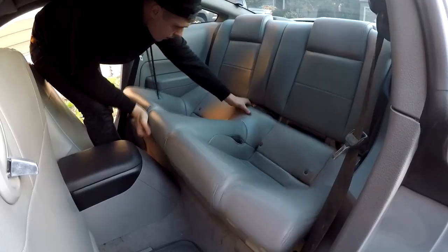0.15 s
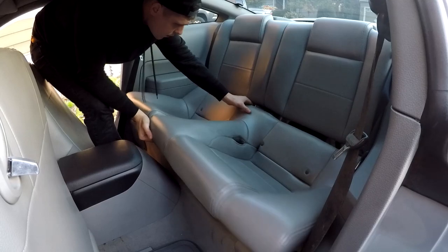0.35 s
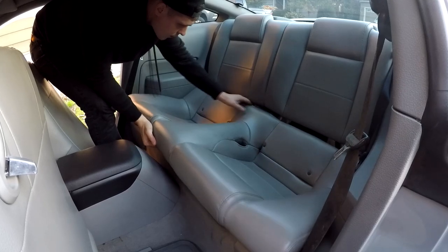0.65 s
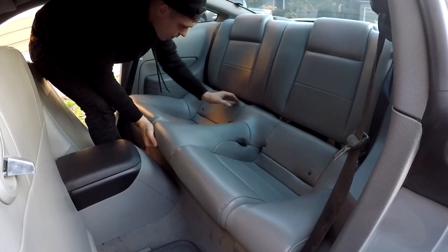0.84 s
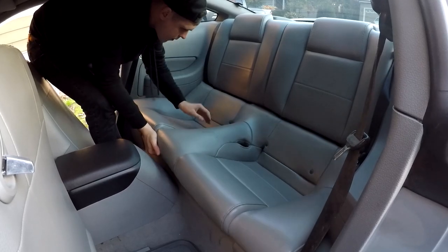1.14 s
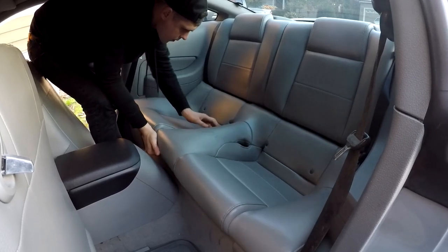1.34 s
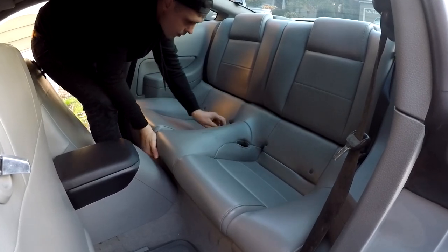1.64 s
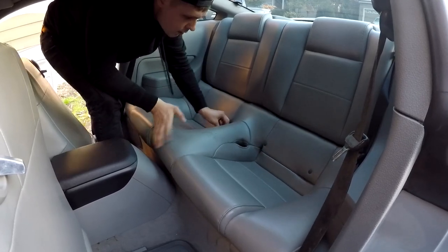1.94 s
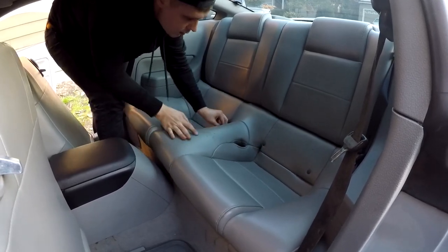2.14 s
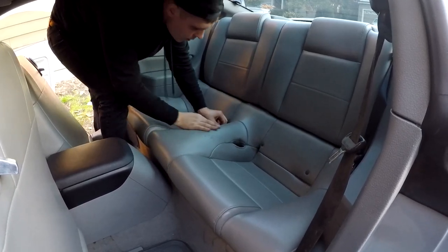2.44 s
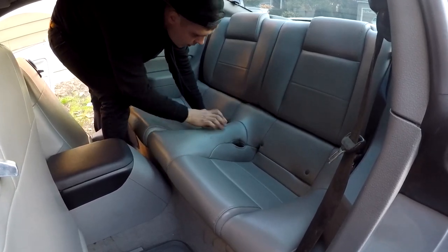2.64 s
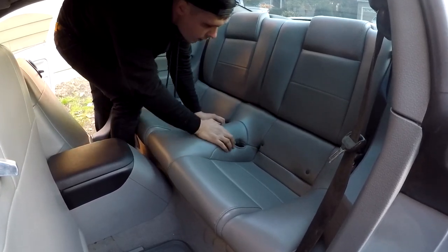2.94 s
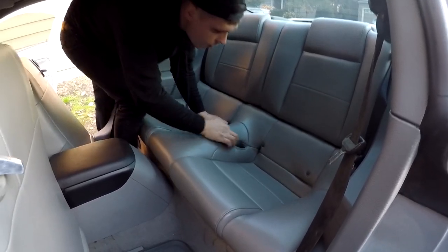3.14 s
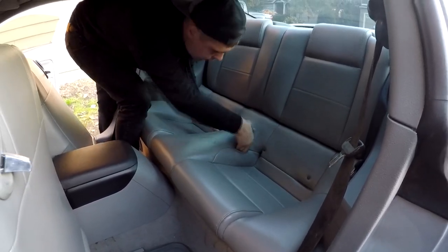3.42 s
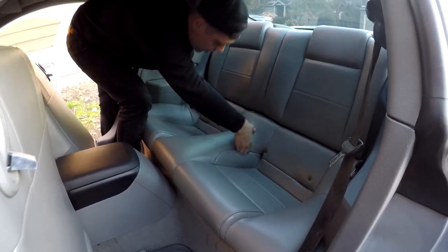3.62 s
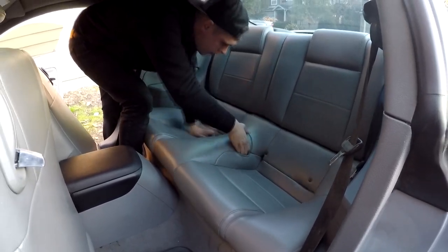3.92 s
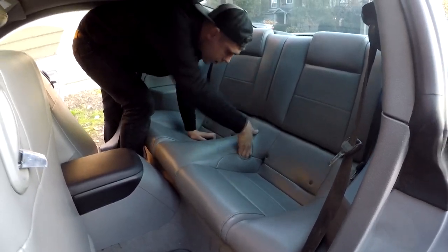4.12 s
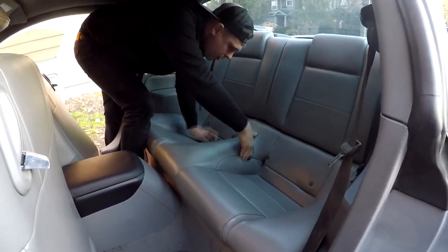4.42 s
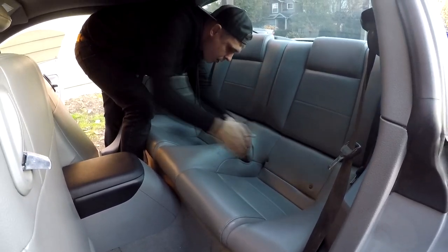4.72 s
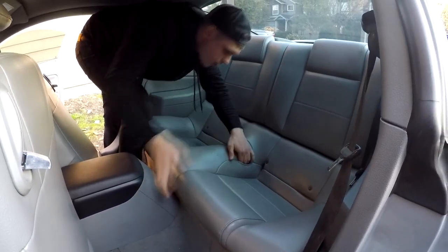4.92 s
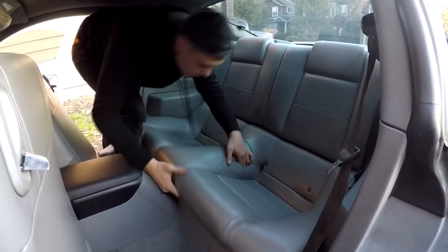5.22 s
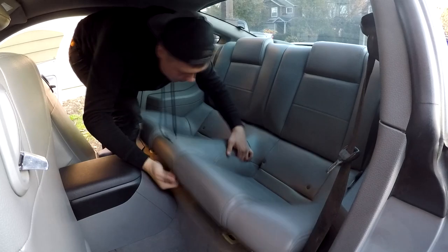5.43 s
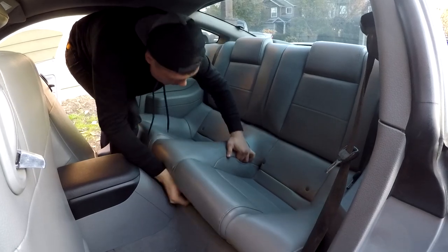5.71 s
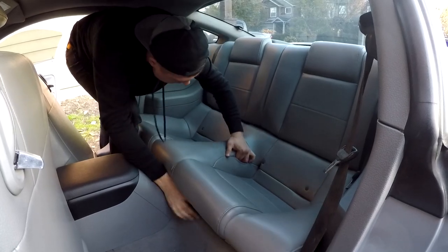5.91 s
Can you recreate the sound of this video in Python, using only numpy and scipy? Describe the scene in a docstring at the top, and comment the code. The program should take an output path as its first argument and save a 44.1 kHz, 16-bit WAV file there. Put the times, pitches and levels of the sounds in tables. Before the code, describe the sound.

Close inside a small, dry car cabin, a leather seat cushion is worked into place by hand. Soft rocking and rubbing lead to knocks and heavy low thuds around one second, then faint bird chirps through the open door. After a quieter stretch of sleeve rustle and seam scrapes, harder shoves and clacks crowd the middle, leather squeaks, and a last knock and bright snap finish.

```python
"""A leather rear seat cushion is pushed into place by hand in a parked car with the door open, 6 s.
From the start filtered noise rocks, flexes and rubs; frame knocks (noise bursts, ringing modes) soon join.
The stereo image narrows from 0.1 to 0.9 s; damped-sine thuds and case jolts follow, then three bird chirps
(wandering tones) from 1.3 to 2 s. From 2.4 s fingers scrape seams (resonated slips); shoves crowd 3 to 4.5 s,
leather squeaks (gliding tones and resonances) follow, mostly up to 5.3 s; a knock and a snap end it."""
import sys
import numpy as np
from scipy import signal
from scipy.fft import rfft, irfft, next_fast_len
from scipy.io import wavfile

SR = 44100
rng = np.random.default_rng(int(sys.argv[2]) if len(sys.argv) > 2 else 0)


def dump_mix(stems):
    """Bounce the given channels to the path in sys.argv[1] as a 16-bit WAV at rate SR."""
    frames = np.atleast_2d(stems).T  # one column per channel
    limited = np.clip(frames, -1, 1)  # hard clip at full scale
    pcm = np.round(limited * 32767).astype(np.int16)
    wavfile.write(sys.argv[1], SR, pcm)


N = 267422

# Levels are relative within a layer; a positive left-right dB means louder on the left.
# Outdoor bird chirps. Each row: start in seconds, level in dB.
CHIRP_STARTS = [(1.275, -47), (1.455, -47.5), (1.965, -50)]
# Course of one chirp. Each row: time from its start in seconds, pitch in Hz, level in dB.
CHIRP_COURSE = [(0, 4580, -4), (0.021, 5160, -0.5), (.05, 4780, 1), (0.1, 4270, -16.5)]
# Jolts through the bodywork into the microphone case. Each row: start in seconds, level in dB, left-right dB.
CASE_JOLTS = [(0.825,-26.5,-12), (1.449,-21.5,-7), (2.949,-13.5,-9), (3.223,-23.5,-11), (3.413,-19.5,-8),
              (3.672,-21.5,-6), (4.225,-23,-4), (4.264,-19.5,-5), (5.225,-20.5,-7.5)]
# Spectrum of that path. Each row: frequency in Hz, level in dB per Hz.
BODYWORK_SPECTRUM = [(70, -4.5), (190, 8), (450, -11.5), (1500, -37.5), (5000, -56)]
# Bright snaps of seams and clips. Each row: start in seconds, rasp level in dB, top treble level in dB.
SEAM_SNAPS = [(1.637,-16,-34.5), (2.721,-26.5,-44), (3.307,-18.5,-26), (3.356,-21,-44), (3.630,-21,-55),
              (5.574,-24,-47), (6.05,-15.5,-29.5)]
# Leather squeaks. Each row: start in seconds, length in seconds, mid pitch in Hz, level in dB,
# glide over the squeak in Hz, width in Hz.
LEATHER_SQUEAKS = [(1.11, 0.096, 4350, -54.5, 7, 190), (3.65, 0.36, 3460, -55, 160, 250),
                   (4.295, 0.05, 5520, -42, -200, 800), (4.308, 0.07, 6886, -47.5, 0, 90),
                   (4.324, 0.055, 3806, -39, 0, 99), (4.34, 0.24, 3806, -57, 7, 45),
                   (4.606, 0.091, 3810, -54, -260, 110), (4.895, 0.1, 4400, -57.5, -30.5, 70),
                   (5.295, 0.05, 1880, -49, 33, 190)]
# Fingers scraping seams. Each row: start in seconds, length in seconds, rasp level in dB, rasp pitch in Hz,
# groan level in dB, left-right dB of the groan.
SEAM_SCRAPES = [(2.416, 0.08, -42.5, 600, -37.5, -6.5), (2.87, 0.18, -48, 1470, -42.5, -11),
                (3.065, 0.2, -45, 1430, -40, 14), (3.841, 0.14, -41.5, 2350, -37.5, -1),
                (4.156, 0.14, -38, 1530, -31, -12), (4.552, 0.12, -49.5, 2780, -48, 34),
                (4.759, 0.078, -46.5, 1830, -62, -5)]
# Shoves of foam on the floor pan. Each row: start in seconds, level in dB, pitch in Hz.
FLOOR_THUDS = [(0.744,-11,60), (1.045,-12.5,53.4), (1.091,-9.5,33.2), (1.214,-13,68.7), (1.877,-19,44.3),
               (3.065,-12,57.6), (3.638,-6,57), (3.715,-9,45.6), (3.902,-10.5,39.7), (3.957,-6.5,163.5),
               (4.209,-8.5,40), (5.387,-16.5,79), (5.509,-20,56), (5.671,-16,150)]
# Frame and trim knocks. Each row: start in seconds, clack level in dB, body level in dB,
# ring of the struck spot in Hz, left-right dB.
FRAME_KNOCKS = [(0.160,-30.5,-33,402,4), (0.254,-33,-36,448,8), (0.639,-35,-28.5,380,0),
                (0.71,-36,-31.5,420,0), (0.904,-21.5,-23,664,0), (1.021,-31.5,-54,1320,-2),
                (1.048,-29,-24.5,430,-1.5), (1.127,-32.5,-23.5,510,-1), (1.238,-35.5,-28.5,750,-3),
                (1.49,-37.5,-24.5,670,-4), (1.599,-18,-26,734,-6.5), (1.624,-22.5,-21,630,0),
                (1.635,-22.5,-23,1000,-4), (2.471,-25.5,-26.5,1560,1), (2.526,-31.5,-33.5,1450,-2),
                (3.074,-35,-32,520,17), (3.103,-32,-26.5,940,26), (3.345,-20,-51,1750,-8),
                (3.366,-17,-29.5,910,-1), (3.468,-13.5,-29.5,1840,-7.5), (3.493,-24,-27.5,1380,-10),
                (3.541,-30,-27,1800,-7), (3.577,-29.5,-31,685,-5), (4.091,-27,-21,443,-2.5),
                (4.111,-22.5,-20,1260,2), (4.458,-25.5,-21.5,940,-5.5), (4.481,-30,-22.5,950,0),
                (5.343,-18,-20,796,-2), (5.487,-23,-30.5,1760,-3), (5.652,-17.5,-21,880,-2.5),
                (5.775,-33,-33.5,1730,-2), (6.050,-20.5,-75,1540,-7.5)]
# Modes of seat frame and floor pan. Each row: mean pitch in Hz, level in dB, t60 in seconds.
FRAME_MODES = [(125.7, -3, 0.096), (225.6, -1, 0.099), (270, 2.5, 0.081), (376, -15.5, 0.18)]
# Car rocking on its springs. Each row: time in seconds, level in dB.
ROCKING_CURVE = [(0.0, -39), (0.47, -43.5), (0.99, -35), (2.85, -49.5), (3.16, -39), (3.78, -32),
                 (4.75, -38.5), (5.25, -35.5), (5.89, -40.5), (6.06, -44.5)]
# Weight on the cushion, as the level of its flexing. Each row: time in seconds, level in dB.
WEIGHT_CURVE = [(0.0, -45), (0.54, -40), (1.01, -41), (2.26, -39.5), (2.95, -38), (3.12, -35.5),
                (4.14, -32), (4.27, -24), (4.51, -42.5), (5.05, -38.5), (5.55, -34), (6.06, -37)]
# Hands press and slide. Each row: start in seconds, length in seconds, body level in dB, rub level in dB.
HAND_STROKES = [(0.11, 0.12, -36, -53.5), (0.618, 0.076, -35.5, -47.5), (0.976, 0.22, -30, -47),
                (1.388, 0.24, -32.5, -50.5), (3.051, 0.13, -37.5, -41), (3.293, 0.37, -55, -45),
                (3.851, 0.14, -29, -38), (4.159, 0.13, -39, -39.5), (5.406, 0.14, -30, -44)]
# Sleeves sweep over the seat. Each row: start in seconds, length in seconds, level in dB.
SLEEVE_SWEEPS = [(0.135, 0.029, -56), (1.004, 0.21, -54), (1.868, 0.13, -52.5), (2.137, 0.42, -55.5),
                 (2.64, 0.37, -53.5), (3.918, 0.07, -48.5), (4.246, 0.18, -49.5), (5.39, 0.32, -50.5),
                 (5.868, 0.47, -47.5)]
# Place of the pressed leather between the ports. Each row: time in seconds, left-right dB.
LEATHER_PLACE = [(0.0, 2.5), (1.45, 0), (2.4, -1), (3.1, -2), (3.58, -7), (3.92, -2), (4.24, -5), (4.5, 0)]
# Source spectra. Each row: frequency in Hz, level in dB per Hz.
RUMBLE_SPECTRUM = [(12, -14), (30, 2), (60, -6), (100, -6), (160, -23.5), (300, -43)]
CUSHION_SPECTRUM = [(60, -28), (110, -1.5), (160, 1.5), (250, -1.5), (330, -12), (480, -22), (900, -37)]
LEATHER_SPECTRUM = [(200, -11.5), (420, 5), (650, 4.5), (1100, -3.5), (1350, -3.5), (1800, -4.5),
                    (2600, -10.5), (4000, -15.5), (8000, -68)]
SLEEVE_SPECTRUM = [(1200, 3.5), (2800, 1), (4300, 2.5), (6000, 4.5), (7500, 0.5), (8500, -5), (11000, -14),
                   (13000, -29), (15500, -14)]
CLACK_SPECTRUM = [(150, -38), (350, 5), (750, 0.5), (1100, -3), (1350, -7.5), (1800, -1.5), (2500, -12),
                  (4000, -37), (9000, -89)]
CRACK_SPECTRUM = [(900, 2.5), (2000, 11), (3300, 6.5), (5500, 1), (7500, -4), (9000, -19), (15000, -41)]
TREBLE_SPECTRUM = [(5000, 3.5), (9000, -1), (12000, -5), (15500, -20)]
# Likeness of the two ports in the cabin. Each row: frequency in Hz, likeness from 0 to 1.
PORT_LIKENESS = [(60, 0.84), (260, 0.95), (800, 0.38), (1250, 0.42), (1700, 0.27), (4200, 0.62),
                 (6800, 0.039)]
# Phase between the ports. Each row: frequency in Hz, left lead in radians.
PORT_LEAD = [(400, 0), (650, .4), (900, 2.0), (1200, 1.3), (2100, 1.2), (3300, .1)]
# Level between the ports. Each row: frequency in Hz, left-right dB.
PORT_LEVEL = [(40, -2), (150, -1), (600, -1.5), (1300, 0.5), (4400, 0), (8000, -2.5)]
# Stereo width. Each row: time in seconds, side level in dB.
SIDE_LEVEL = [(0.08, 2), (0.15, -45), (0.42, -37), (0.55, -13), (0.85, -1.5)]

CABIN_T60_S = 0.14
STOPBAND_EDGE_HZ = 15900
MODE_PHASE_RADIANS = 0.2  # added at one port, taken off at the other
DIRECT_SHARE = 0.1  # of a blow's energy
# crack over the tabled clack level at a spot ringing at 800 Hz; higher, harder spots crack more
CRACK_DB, CRACK_DB_PER_OCTAVE = -15, 0.5
# chatter over the tabled clack level at 800 Hz
CHATTER_DB, CHATTER_DB_PER_OCTAVE, CHATTER_T60_S = -39.5, 12.5, 0.86
# hide resonances under a scrape; both rise as it is drawn tight
RASP_WIDTH_HZ, GROAN_HZ, GROAN_WIDTH_HZ, TIGHTEN_OCTAVES = 870, 313, 260, 0.082
# drag and brush between strokes: level at 0 s under mean weight, share of the weight's swing
DRAG_DB, DRAG_FOLLOWS = -53.5, 0.68
BRUSH_DB, BRUSH_FOLLOWS = -69, 0.041
# both grow as the hands work towards the near seat
DRAG_DB_PER_S, BRUSH_DB_PER_S = 0.97, 2.5
CUFF_DB = -12.5  # cuff swish over the tabled rub level of a stroke
# spreads and drift corners: lumpy foam and bumpy rocking, a dragging hand's catches
LUMP_DB, BUMP_DB, LUMP_CORNER_HZ = 3, 2, 7.1
CATCH_DB, CATCH_CORNER_HZ = -0.5, 14.4

T = np.arange(N) / SR
T_SHORT = T[:SR // 4]
PADDED = next_fast_len(N + 8192) // 2 * 2
FREQS_HZ = np.arange(PADDED // 2 + 1) * SR / PADDED
LEFT_RIGHT = np.array([[1], [-1]])


def from_db(db):
    """Decibels to gain."""
    return 10 ** (np.asarray(db) / 20)


def rms_one(x):
    """Scale to rms 1."""
    return x / np.sqrt(np.mean(x ** 2) + 1e-20)


def over_hz(points):
    """Join a table by straight lines on a log-frequency axis."""
    hz, value = np.transpose(points)
    return np.interp(np.log(FREQS_HZ + 1), np.log(hz), value)


def in_time(rows):
    """The columns of a curve table, one value a sample."""
    s, *columns = np.transpose(rows)
    return [np.interp(T, s, column) for column in columns]


def coloured(x, spectrum):
    """Minimum-phase filter, falling away beyond the spectrum's ends; white noise keeps its power."""
    low_hz, low_db = spectrum[0]
    high_hz, high_db = spectrum[-1]
    points = [(low_hz / 4, low_db - 30), *spectrum, (high_hz * 4, high_db - 30)]
    gain = rms_one(from_db(over_hz(points)))
    # the folded cepstrum makes the filter causal
    cepstrum = irfft(np.log(gain))[:PADDED // 2]
    cepstrum[1:] *= 2
    response = np.exp(rfft(cepstrum, PADDED))
    return irfft(rfft(x, PADDED) * response)[..., :N]


def in_cabin(x, spectrum):
    """Colour two unrelated channels and blend them as far as the ports hear alike."""
    left, right = coloured(x, spectrum)
    alike = np.clip(over_hz(PORT_LIKENESS), 0, 1)
    mid = rfft(left + right, PADDED) * np.sqrt(1 + alike)
    side = rfft(left - right, PADDED) * np.sqrt(1 - alike)
    return irfft(mid + LEFT_RIGHT * side)[:, :N] / 2


def panned(db):
    """Gains of the two channels for a left-right difference, mean power 1."""
    gains = from_db(LEFT_RIGHT * db / 2)
    return gains / np.sqrt(np.mean(gains ** 2, axis=0))


def add(out, s, sound):
    """Mix a sound in at time s."""
    i = int(np.clip(s * SR, 0, N - 1))
    out[..., i:i + sound.shape[-1]] += sound[..., :N - i]


def arch(length_s, roundness=1.27):
    """A smooth swell and fade."""
    return np.abs(np.sin(np.linspace(0, np.pi, int(length_s * SR)))) ** roundness


def drift(corner_hz):
    """Slow random wander of rms 1: noise through two equal poles, one value per 40 samples, interpolated."""
    r = np.exp(-80 * np.pi * corner_hz / SR)
    noise = rng.standard_normal(N // 40 + 2002)
    slow = signal.lfilter([1], [1, -2 * r, r * r], noise)[2000:]  # settled part
    return np.interp(np.arange(N) / 40, np.arange(len(slow)), rms_one(slow))


def stereo_noise(size=N):
    """White noise, unrelated in the two channels."""
    return rng.standard_normal((2, size))


def burst(t60_s, rise_s, tail_db):
    """A contact and its dense cabin reflections: a quick decay over a faint cabin tail."""
    t = T_SHORT
    decay = from_db(-60 * t / abs(t60_s)) + from_db(tail_db - 60 * t / CABIN_T60_S)
    return stereo_noise(size=len(t)) * decay * (1 - np.exp(-t / rise_s))


def struck(reflections):
    """Put a direct click, alike in both ports, 1 ms into the reflections; DIRECT_SHARE sets its energy."""
    share = np.clip(DIRECT_SHARE, 0, 1)
    out = reflections * np.sqrt(1 - share)
    out[:, SR // 1000] += np.sqrt(share * np.sum(reflections ** 2) / 2)
    return out


def friction(slips_per_s, spread_db, grain_share):
    """Tiny slips of uneven size at four spots, smeared by the cabin, over a smooth hiss."""
    sizes = from_db(spread_db * np.minimum(rng.exponential(1, N), 3.5)) * rng.choice([-1, 1], N)
    slips = sizes * (rng.random(N) < slips_per_s / SR)
    spot = rng.choice(4, N)
    grains = np.zeros((2, N))
    for k in range(4):
        smear = burst(0.021, 0.00034, -7.0)
        grains += signal.oaconvolve([slips * (spot == k)], smear, axes=1)[:, :N]
    share = np.clip(grain_share, 0, 1)
    return np.sqrt(share) * rms_one(grains) + np.sqrt(1 - share) * stereo_noise()


def stick_slip(slips_per_s, uneven_db, fade):
    """An uneven train of slips: noise jumps up at each, then falls by exp(-fade) until the next."""
    rate_hz = slips_per_s * from_db(uneven_db * drift(25))
    cycle = np.cumsum(rate_hz) / SR % 1
    return stereo_noise() * np.exp(-fade * cycle)


def gliding_ring(x, hz, width_hz):
    """A steep resonance whose centre hz has one value a sample; rms 1."""
    turn = np.exp(2j * np.pi * np.cumsum(hz) / SR)
    r = np.exp(-np.pi * abs(width_hz) / SR)
    ring = signal.lfilter([1], [1, -2 * r, r * r], x / turn) * turn
    return rms_one(ring.real)


def wavering_tone(hz, width_hz):
    """A sine whose phase wanders below 500 Hz; hz has one value a sample."""
    wander = np.cumsum(stereo_noise(size=len(hz)), axis=1) * np.sqrt(2 * np.pi * abs(width_hz) / SR)
    wander = signal.sosfilt(signal.butter(2, 500, fs=SR, output="sos"), wander)
    return np.sqrt(2) * np.sin(2 * np.pi * np.cumsum(hz) / SR + wander)


def bird(upper_ratio=1.58, upper_db=-13):
    """Hoarse chirps rise briefly, then fall, with a weaker upper voice, blurred by the yard."""
    out = np.zeros((2, N))
    at_s, hz, shape_db = np.transpose(CHIRP_COURSE)
    t = T[:int(at_s[-1] * SR)]
    pitch_hz = np.interp(t, at_s, hz)
    shape = from_db(np.interp(t, at_s, shape_db))
    for s, db in CHIRP_STARTS:
        lower = wavering_tone(pitch_hz, width_hz=380)
        upper = from_db(upper_db) * wavering_tone(pitch_hz * upper_ratio, width_hz=660)
        add(out, s, from_db(db) * shape * (lower + upper))
    yard = burst(0.076, 0.00028, -14)
    yard /= np.sqrt(np.sum(yard ** 2) / 2)
    return signal.fftconvolve(out, yard, axes=1)[:, :N]


def jolts():
    """Jolts shake the microphone case, moving its two ports in opposite directions."""
    force = np.zeros((2, N))
    for s, db, pan_db in CASE_JOLTS:
        add(force, s, panned(pan_db) * from_db(db) * np.sqrt(SR / 100))  # one-sample impulse
    return LEFT_RIGHT * coloured(force, BODYWORK_SPECTRUM)


def snaps():
    """Seams and clips let go with short bright rasps."""
    rasp, top = np.zeros((2, 2, N))
    for s, db, top_db in SEAM_SNAPS:
        add(rasp, s, from_db(db - 10.5) * burst(0.058, 0.00085, -5.0))
        add(top, s, from_db(top_db + 6.5) * burst(0.028, 0.0038, -16.5))
    return in_cabin(rasp, CRACK_SPECTRUM) + in_cabin(top, TREBLE_SPECTRUM)


def chatter():
    """Loose trim ticks on for a moment after each knock, more after loud and high-ringing ones."""
    shake = np.zeros(N)
    for s, clack_db, _, hz, _ in FRAME_KNOCKS:
        start_db = clack_db + CHATTER_DB + CHATTER_DB_PER_OCTAVE * np.log2(hz / 800)
        add(shake, s, from_db(start_db - 60 * T[:SR] / CHATTER_T60_S))
    ticks = friction(slips_per_s=64, spread_db=7.5, grain_share=0.93)
    return in_cabin(ticks * shake, CLACK_SPECTRUM)


def squeaks(clean_below_hz=190, line_narrowing=0.12):
    """Skin sticks and slips on hide: wide resonances stay hoarse, narrow ones lock into clean gliding tones."""
    out = np.zeros((2, N))
    slips = stick_slip(slips_per_s=140, uneven_db=4.5, fade=1.3)
    for s, length_s, hz, db, glide_hz, width_hz in LEATHER_SQUEAKS:
        swell = arch(length_s, roundness=0.59)
        pitch_hz = hz + glide_hz * np.linspace(-.5, .5, len(swell))
        drive = slips[:, int(s * SR):][:, :len(swell)]
        clean = np.exp(-(width_hz / clean_below_hz) ** 2)
        hoarse = gliding_ring(drive, pitch_hz, width_hz)
        tone = wavering_tone(pitch_hz, width_hz * line_narrowing)
        add(out, s, from_db(db + 3.5) * swell * (np.sqrt(clean) * tone + np.sqrt(1 - clean) * hoarse))
    return out


def scrapes():
    """Fingers dig along a seam: uneven slips make the hide rasp and groan."""
    out = np.zeros((2, N))
    slips = stick_slip(slips_per_s=110, uneven_db=5.0, fade=1.44) * from_db(1.9 * drift(57))
    for s, length_s, rasp_db, hz, groan_db, pan_db in SEAM_SCRAPES:
        swell = arch(length_s, roundness=0.49)
        drive = slips[:, int(s * SR):][:, :len(swell)]
        tight = 2 ** (TIGHTEN_OCTAVES * np.linspace(-.5, .5, len(swell)))
        rasp = from_db(rasp_db) * gliding_ring(drive, hz * tight, RASP_WIDTH_HZ)
        groan = from_db(groan_db) * gliding_ring(drive, GROAN_HZ * tight, GROAN_WIDTH_HZ)
        add(out, s, swell * (rasp + panned(pan_db) * groan))
    return out


def thuds(swell_cycles=0.77, spread_radians=0.41):
    """Foam damps the floor pan, so a shove swells and dies within a few cycles."""
    out = np.zeros((2, N))
    for s, db, hz in FLOOR_THUDS:
        cycles = hz * T_SHORT
        swell = cycles / swell_cycles
        envelope = (swell * np.exp(1 - swell)) ** 2
        phase = 2 * np.pi * cycles + spread_radians * LEFT_RIGHT * rng.choice([-1, 1])
        add(out, s, from_db(db - 4.0) * envelope * np.sin(phase))
    return out


def knocks(spot_q=1.24, spot_db=8.0):
    """Each knock cracks at the contact, clacks in the trim and sets the seat frame ringing."""
    clack, crack, body = np.zeros((3, 2, N))
    t = T_SHORT
    for s, clack_db, body_db, hz, pan_db in FRAME_KNOCKS:
        crack_db = clack_db + CRACK_DB + CRACK_DB_PER_OCTAVE * np.log2(hz / 800)
        sides = panned(pan_db)
        t60_s = 0.084 * (800 / hz) ** 1.22  # large soft spots ring lower and longer
        blow = struck(burst(t60_s, 0.000057, -14.5))
        spot = signal.lfilter(*signal.iirpeak(hz, spot_q, fs=SR), blow)
        # the spot takes its band's share of the blow
        spot = rms_one(spot) * blow.std() * np.sqrt(np.pi * hz / spot_q / SR)
        add(clack, s, sides * from_db(clack_db - 10.0) * (blow + from_db(spot_db) * spot))
        add(crack, s, sides * from_db(crack_db) * burst(t60_s, 0.00082, -8.0))
        rise = 1 - np.exp(-t / 0.0051)
        for k, (mode_hz, mode_db, mode_t60_s) in enumerate(FRAME_MODES):
            detuned_hz = mode_hz * rng.normal(1, 0.045)
            phase = 2 * np.pi * detuned_hz * t + MODE_PHASE_RADIANS * LEFT_RIGHT * rng.choice([-1, 1])
            decay = from_db(body_db + 5 + mode_db - 60 * t / mode_t60_s)
            add(body, s, sides * decay * np.sin(phase) * rise * (-1) ** k)
    return in_cabin(clack, CLACK_SPECTRUM) + in_cabin(crack, CRACK_SPECTRUM) + body


def contact_levels():
    """Gains of flex, drag and brush: all follow the weight; stroke and sweep powers add on top."""
    weight_db, = in_time(WEIGHT_CURVE)
    lean_db = weight_db - weight_db.mean()
    flex_db = weight_db - 1.0 + LUMP_DB * drift(LUMP_CORNER_HZ)
    drag_db = DRAG_DB + DRAG_FOLLOWS * lean_db + DRAG_DB_PER_S * T + CATCH_DB * drift(CATCH_CORNER_HZ)
    brush_db = BRUSH_DB + BRUSH_FOLLOWS * lean_db + BRUSH_DB_PER_S * T
    power = from_db([flex_db, drag_db, brush_db]) ** 2
    for s, length_s, body_db, rub_db in HAND_STROKES:
        stroke_db = [[body_db], [rub_db], [rub_db + CUFF_DB]]
        add(power, s, from_db(stroke_db) ** 2 * arch(length_s))
    for s, length_s, db in SLEEVE_SWEEPS:
        add(power[2], s, from_db(db) ** 2 * arch(length_s))
    return np.sqrt(power)


def handling():
    """The cushion rocks and flexes while hands drag on the leather and sleeves brush over it."""
    flex, drag, brush = contact_levels()
    rocking_db, = in_time(ROCKING_CURVE)
    bumpy_db = rocking_db + 6 + BUMP_DB * drift(LUMP_CORNER_HZ)
    rumble = in_cabin(stereo_noise() * from_db(bumpy_db), RUMBLE_SPECTRUM)
    body = in_cabin(stereo_noise() * flex * from_db(0.5), CUSHION_SPECTRUM)
    hide_slips = friction(slips_per_s=330, spread_db=5.0, grain_share=0.76)
    rub = in_cabin(hide_slips * drag * from_db(2.5), LEATHER_SPECTRUM)
    cloth_slips = friction(slips_per_s=500, spread_db=4.0, grain_share=0.63)
    swish = in_cabin(cloth_slips * brush * from_db(5.0), SLEEVE_SPECTRUM)
    # steady hiss of the finest fibres
    fibres = in_cabin(stereo_noise() * from_db(-64), TREBLE_SPECTRUM)
    place_db, = in_time(LEATHER_PLACE)
    return rumble + panned(place_db) * (body + rub) + swish + fibres


def scene():
    """Sum of the sources in and around the car."""
    background = bird() + jolts() + snaps() + chatter()
    return background + squeaks() + scrapes() + thuds() + knocks() + handling()


def record(dry):
    """The two ports differ in level and phase; the image narrows early and reopens; the top is cut."""
    half = from_db(over_hz(PORT_LEVEL) / 2) * np.exp(.5j * over_hz(PORT_LEAD))
    left, right = irfft(rfft(dry, PADDED) * np.array([half, 1 / half]))[:, :N]
    side_db, = in_time(SIDE_LEVEL)
    ports = (left + right + LEFT_RIGHT * from_db(side_db) * (left - right)) / 2
    top_cut = signal.cheby2(16, 70, STOPBAND_EDGE_HZ, fs=SR, output="sos")
    return signal.sosfilt(top_cut, ports)


dry = scene()
out = record(dry)
dump_mix(out)
```